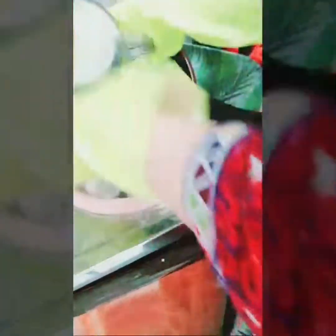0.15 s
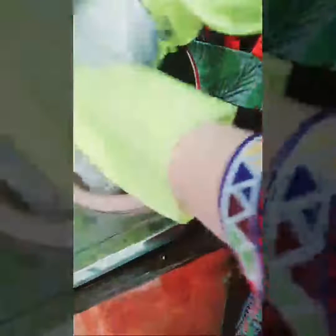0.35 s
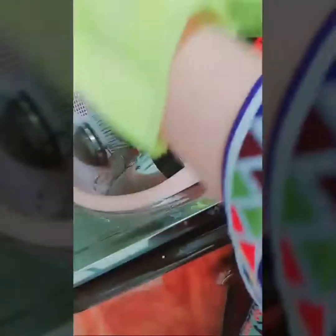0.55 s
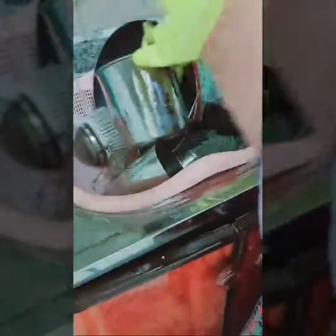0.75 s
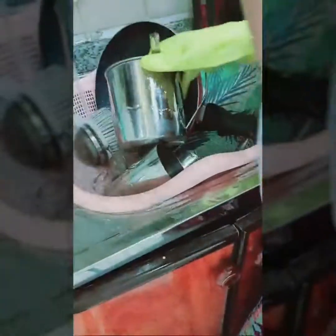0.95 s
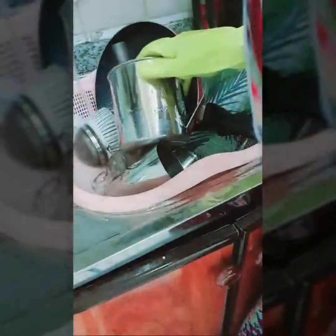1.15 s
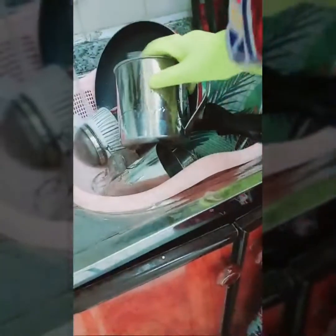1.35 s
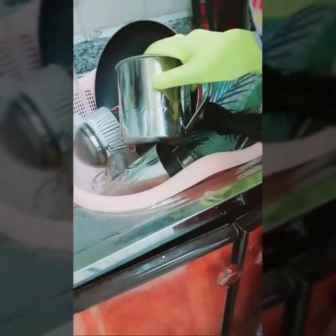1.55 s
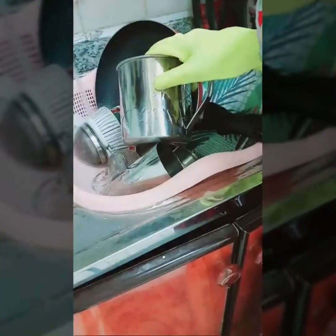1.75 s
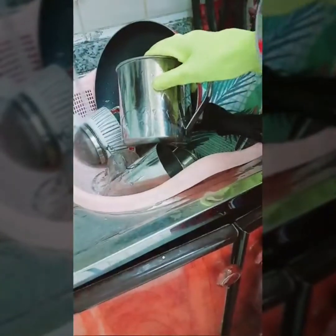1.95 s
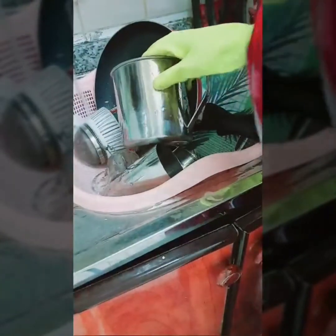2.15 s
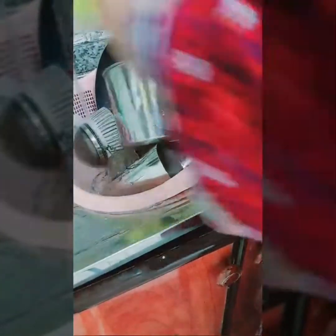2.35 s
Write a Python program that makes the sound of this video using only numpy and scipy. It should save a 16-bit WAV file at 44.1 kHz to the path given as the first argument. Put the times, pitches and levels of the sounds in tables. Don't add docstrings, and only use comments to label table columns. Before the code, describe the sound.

Steel dishes clatter in a metal kitchen sink, heard close on a phone microphone. Dull rattling bumps begin around 0.1 s; a loud hard clank at 0.4 and a lighter one at 0.6 set cups ringing, leaving a thin singing tone. From 1.1 to 1.5 a pot scrapes, squeaks and moans hollowly. Dull thumps and knocks follow from 1.55 to 2.3 over faint kitchen hum and hiss.

```python
import sys
import numpy as np
from scipy import signal
from scipy.fft import rfft, irfft
from scipy.io import wavfile
from scipy.ndimage import uniform_filter1d

SR = 44100
rng = np.random.default_rng(int(sys.argv[2]) if len(sys.argv) > 2 else 0)


def ratio(d):
    e = np.asarray(d, float) / 20
    return 10 ** e


def to_wav(s):
    ch = np.atleast_2d(s).T
    pcm = np.round(np.clip(ch, -1, 1) * 32767)
    wavfile.write(sys.argv[1], SR, pcm.astype(np.int16))


N = 103635

# (time [s], boom [dB], knock [dB], clatter [dB], rattle length [s])
BUMPS = [(0.124, -35.5, -33.5, -31, 0.084), (0.197, -27, -26.5, -30, 0.05), (0.298, -27, -31, -39, 0.063),
         (0.4, -12, -22.5, -25, 0.016), (0.421, -26, -34, -53, 0.082), (0.608, -19, -27.5, -28.5, 0.025),
         (0.67, -29, -39, -50, 0.051), (0.75, -45.5, -46, -57, 0.12), (1.558, -24, -34.5, -48, 0.03),
         (1.594, -37.5, -42.5, -63, 0.075), (1.727, -32, -53, -36.5, 0.035),
         (1.748, -17, -31.5, -38, 0.025), (1.826, -33.5, -43, -41.5, 0.025),
         (1.947, -54, -79, -41.5, 0.055), (2.006, -17, -30, -37.5, 0.039), (2.108, -27, -62, -56, 0.027),
         (2.146, -25.5, -39, -37, 0.034), (2.201, -38.5, -40, -46.5, 0.063),
         (2.271, -34.5, -52, -51, 0.033), (2.309, -49, -57, -37, 0.011)]
# (frequency [Hz], level [dB], t60 [s])
FLOOR_MODES = [(63, 0, 0.5), (83.7, -1.5, 0.22), (117.7, 2.5, 0.092), (142, -10.5, 0.031),
               (255.7, -9, 0.24)]
# (frequency [Hz], level [dB], t60 [s])
WALL_MODES = [(356, 3, 0.034), (448.3, -6.5, 0.055), (506, -9.5, .08), (638, 6, 0.28), (773, 0.5, 0.079),
              (977, -7, 0.3), (1455, -10, 0.052)]
# (frequency [Hz], density [dB per Hz])
CLATTER_SPECTRUM = [(500, -5), (900, -4), (1500, -5), (2800, 0.5), (5000, -3.5), (7500, -7.5), (13000, -32)]


def basin():
    boom_fall_s, clatter_fall_s = 0.029, 0.044
    _, boom_db, knock_db, clatter_db, _ = np.transpose(BUMPS)
    rattle = grit(2000, 2.72, 0.75)
    floor = body(rattle * bursts(boom_db, boom_fall_s), FLOOR_MODES)
    wall = body(rattle * bursts(knock_db, boom_fall_s), WALL_MODES)
    clatter = evened(banded(colour(rattle, CLATTER_SPECTRUM)))
    return floor + wall, clatter * bursts(clatter_db, clatter_fall_s)


def bursts(level_db, fall_s):
    rise_s = 0.0017
    t = np.arange(N) / SR
    start, length = np.transpose(BUMPS)[[0, -1]][:, :, None]
    rise = np.clip((t - start) / rise_s, 0, 1)
    fall = np.exp(-np.maximum(t - start - length, 0) / fall_s)
    return np.sqrt(((ratio(level_db)[:, None] * rise * fall) ** 2).sum(0))


# (time [s], level [dB])
RIM_HITS = [(.131, -46), (.203, -41), (.216, -40), (.244, -42), (.313, -27.5), (.334, -28), (.408, -16),
            (.622, -22.5), (.796, -37), (.83, -56), (1.566, -32), (1.737, -40), (1.752, -28), (1.765, -30),
            (1.812, -32), (2.011, -24), (2.03, -28), (2.06, -22.5), (2.127, -31), (2.166, -31),
            (2.199, -26), (2.226, -37.5), (2.278, -37.5)]
# (frequency [Hz], level [dB], t60 [s])
RIM_MODES = [(297, -6.5, 0.089), (396, -6, 0.068), (463.5, 0, 0.095), (555, 0.5, 0.023),
             (729, -10.5, 0.042), (942, -12.5, 0.021), (1135, -19.5, 0.025), (1470, -7, 0.12),
             (1826, -8.5, 0.035)]


def rim_knocks():
    return ring(RIM_HITS, RIM_MODES, 4.0, 0.39)[0]


# (time [s], level [dB])
CLANK_HITS = [
    (.406, -20.5),
    (.411, -19.5),
    (0.39, -31),
    (.611, -29.5),
    (.619, -28),
    (.313, -31.5),
    (0.24, -34),
]
# (frequency [Hz], level [dB], t60 [s])
CLANK_MODES = [(533, 3.5, 0.052), (800, -3, 0.13), (1004, 1, 0.084), (1184, 2, 0.044), (1510, -6, .06),
               (2040, -12, 0.072), (2370, -8, 0.045)]


def clanks():
    return ring(CLANK_HITS, CLANK_MODES, 2.8, 0.19)[0]


# (time [s], crack [dB], crowd [dB], crowd t60 [s])
BLOWS = [
    (0.13, -40, -46, 0.096),
    (0.203, -44, -35, 0.052),
    (0.406, -9, -25.5, 0.29),
    (.611, -24.5, -22.5, 0.23),
    (0.975, -47, -45, 0.21),
    (1.192, -20.5, -29.5, 0.25),
    (1.382, -28, -40, 0.066),
]
# (frequency [Hz], density [dB per Hz])
BLOW_SPECTRUM = [(1500, -7), (3000, 0.5), (5300, 0.5), (7500, 0), (9500, 0), (12000, -1.5)]


def blows():
    count, low_hz, high_hz, spread_db = 160, 2256, 13020, 10
    crack_s, rise_s = 0.0037, 0.0012
    out, t = np.zeros((2, N)), np.arange(SR // 5) / SR
    hiss = evened(colour(grit(4000, 4.9, 1), BLOW_SPECTRUM))[:len(t)]
    crack = hiss * np.exp(-t / crack_s) * np.minimum(t / rise_s, 1)
    for s, crack_db, crowd_db, t60 in BLOWS:
        place, share, last, late, left, right = rng.random((count, 6)).T[:, :, None]
        hz = low_hz + (high_hz - low_hz) * place
        own = np.maximum(t - 0.027 * late, 0)
        fall_db = 60 * own / (t60 * (.5 + .5 * last))
        level = ratio(read(BLOW_SPECTRUM, hz) - spread_db * share - fall_db) * (own > 0)
        sides = (left, left + right - .5)
        crowd = np.array([(level * np.sin(2 * np.pi * (hz * own + side))).sum(0) for side in sides])
        crowd = crowd / np.sqrt(np.mean(crowd[:, :1000] ** 2))
        at = round(s * SR)
        out[:, at:at + len(t)] += ratio(crowd_db) * crowd + ratio(crack_db) * crack
    return out


# (time [s], level [dB])
CUP_HITS = [
    (.406, -14),
]
# (frequency [Hz], level [dB], t60 [s])
CUP_MODES = [(2541, -12, 0.1), (2824, -7.5, 0.34), (4470, -16, 0.49), (4910, -5, 0.14), (5483, -13.5, 0.25),
             (6099, -11, 0.048), (6551, -33, 0.39), (7730, -3, 0.25), (7640, -6, 0.19), (661, 0, 0.067),
             (256, -7.5, 0.53), (1780, -8.5, 0.12), (3700, -5, 0.13), (4740, -13, 0.11)]
# (time [s], level [dB])
REBOUND_HITS = [
    (.417, -6),
]
# (frequency [Hz], level [dB], t60 [s])
REBOUND_MODES = [(3015, 0, .165)]
# (time [s], level [dB])
MUG_HITS = [
    (.611, -31.5),
    (.624, -21.5),
    (.64, -39.5),
    (.668, -35),
    (.695, -41),
]
# (frequency [Hz], level [dB], t60 [s])
MUG_MODES = [(704, -1, 0.16), (2470, -7, 0.35), (4188, -33, 0.19), (4888, -6, 0.19), (5670, -5.5, 0.23),
             (5570, -8, 0.21), (6360, -13, 0.058), (7320, 4.5, .1), (7460, 0, 0.13), (1809, -22, 0.13),
             (2898, -10.5, 0.36), (3310, -15, 0.46), (3570, -6, 0.34), (1140, -14, 0.071)]


def cups():
    first = ring(CUP_HITS, CUP_MODES, 0, 1.0) + ring(REBOUND_HITS, REBOUND_MODES, 0, 0.033)
    return first + ring(MUG_HITS, MUG_MODES, 2.5, 1.0)


# (time [s], level [dB])
LID_HITS = [
    (.70, -33),
    (.745, -36),
]
# (frequency [Hz], level [dB], t60 [s])
LID_MODES = [(3880, 0, 0.37), (2947, -8, 0.21)]


def lid():
    return ring(LID_HITS, LID_MODES, 0, 0.83)


# (time [s], level [dB])
PAN_HITS = [
    (.665, -43),
]
# (frequency [Hz], level [dB], t60 [s])
PAN_MODES = [(1377, 0, 3.5)]


def pan():
    return ring(PAN_HITS, PAN_MODES, 0, 1.0)


# (time [s], level [dB])
POT_HITS = [
    (1.191, -27.5),
    (1.215, -47),
]
# (frequency [Hz], level [dB], t60 [s])
POT_MODES = [(2370, 3.5, 0.16), (1630, 2, 0.22), (850, -9, 0.38), (435, -5, 0.13), (3270, 2, 0.088)]
# (time [s], level [dB])
HUM_HITS = [
    (1.525, -46),
    (1.565, -45),
    (1.65, -47),
]
# (frequency [Hz], level [dB], t60 [s])
HUM_MODES = [(552, 0, 0.87)]
# (time [s], level [dB])
CATCH_HITS = [
    (1.372, -22),
    (1.389, -25.5),
]
# (frequency [Hz], level [dB], t60 [s])
SQUEAK_MODES = [(3295, 5.5, 0.17), (5110, -2, 0.22)]


def pot_rings():
    knocked = ring(POT_HITS, POT_MODES, 3.9, 0.57)
    humming = ring(HUM_HITS, HUM_MODES, 0.96, 1.0)
    return knocked + humming + ring(CATCH_HITS, SQUEAK_MODES, 0, 1.0)


# (time [s], scrape [dB], hollow note [dB])
DRAG = [
    (1.122, -39, -52),
    (1.179, -31.5, -36.5),
    (1.199, -18.5, -32),
    (1.25, -24, -29.5),
    (1.285, -27.5, -31.5),
    (1.355, -28.5, -24),
    (1.39, -23.5, -29),
    (1.434, -26.5, -34),
    (1.49, -44, -41),
]
# (frequency [Hz], width [Hz], level [dB])
FLAT_PEAKS = [(1696, 32, -9.5), (2360, 14, -17), (2840, 28, -0.5), (3330, 110, 3.5), (4410, 72, -21),
              (5060, 23, 3), (5340, 40, 0), (5860, 38, -4.5), (6700, 31, 1), (7060, 73, 6.5)]
# (frequency [Hz], width [Hz], level [dB])
TILTED_PEAKS = [(1713, 51, 0.5), (2500, 450, 5.5), (2970, 30, -5), (3490, 150, -1), (3450, 59, -20),
                (3700, 41, -1.5), (4200, 33, -26), (5000, 28, -32), (7430, 71, -1)]
# (frequency [Hz], density [dB per Hz])
GRIT_SPECTRUM = [(530, -39), (900, -7.5), (1680, -24), (2230, -24), (3280, 1), (11900, -13), (13500, -47)]


def scrape():
    tilt_s, tilt_span_s, hiss_db = 1.29, 0.27, -2.5
    s, db, _ = np.transpose(DRAG)
    slips, t = grit(2500, 2.5, 0.56), np.arange(N) / SR
    flat, tilted = wandering(slips, FLAT_PEAKS), wandering(slips, TILTED_PEAKS)
    tilt = np.clip((t - tilt_s) / tilt_span_s + .5, 0, 1) * np.pi / 2
    level = ratio(np.interp(t, s, db, -120, -120) + 0.52 * drift(200))
    hiss = ratio(hiss_db) * evened(banded(colour(slips, GRIT_SPECTRUM)))
    return level * evened(np.cos(tilt) * flat + np.sin(tilt) * tilted + hiss)


def wandering(slips, peaks):
    wander_db, out = 4, np.zeros(N)
    for hz, width_hz, db in peaks:
        out += ratio(db + wander_db * drift(700)) * evened(resonate(slips, hz, 1.65 * width_hz))
    return evened(out)


# (time [s], level [dB], half width [s])
SWELLS = [
    (1.251, -26, 0.016),
    (1.311, -26, 0.017),
    (1.356, -18, .009),
    (1.384, -21, 0.0075),
    (1.41, -26.5, 0.0072),
    (1.429, -28, 0.0047),
]


def hollow():
    hz, width_hz = 514.5, 55.5
    s, _, db = np.transpose(DRAG)
    t = np.arange(N) / SR
    slips = grit(360, 4.8, 0.55)
    note = evened(resonate(resonate(slips, hz, width_hz), hz, 2 * width_hz))
    swells = sum(ratio(d) * np.exp(-((t - at) / width) ** 2) for at, d, width in SWELLS)
    tone = np.sin(2 * np.pi * np.cumsum(hz + 12 * drift(900)) / SR)
    return note * ratio(np.interp(t, s, db - 5, -120, -120)) + swells * tone


def kitchen(x):
    room_t60_s, room_db, even_share = .22, -12, .7
    wide_db, wide_hz = 1.5, 482
    t = np.arange(SR // 3) / SR
    taps = rng.choice([-1., 1.], (2, len(t))) * (rng.random((2, len(t))) < .05)
    near = taps * np.exp(-t / 0.004)
    tail = taps * ratio(-60 * t / room_t60_s) * (t > .008)
    sheen = rfft(near[:, :512])
    near[:, :512] = irfft(sheen / (abs(sheen) + 1e-9) ** even_share) * np.linspace(1, 0, 512)
    near[:, 512:] = 0
    near, tail = near / np.linalg.norm(near[0]), tail / np.linalg.norm(tail[0])
    high = signal.lfilter(*signal.butter(2, wide_hz, "high", fs=SR), x)
    return signal.fftconvolve(high[None], ratio(wide_db) * near + ratio(room_db) * tail, axes=1)[:, :N]


# (frequency [Hz], density [dB per Hz])
AIR_SPECTRUM = [(24, -38), (40, -2), (103, -11.5), (186, -17), (1510, -18.5), (5480, -15.5), (12200, -22.5),
                (13500, -39)]
# (frequency [Hz], likeness [0 to 1])
LIKENESS = [(60, 1), (230, 1), (890, 0.1), (3410, 0.023), (13100, 0.036)]


def air():
    air_db, hum_hz, hum_width_hz, hum_db = -39, 97, 35, -49
    frames, hz = N // 256 + 5, np.fft.rfftfreq(1024, 1 / SR)
    a, b, c, d, patches = rng.standard_normal((frames, 513, 5)).T
    patches = evened(uniform_filter1d(uniform_filter1d(patches, 10, 0), 10, 1))
    same = np.clip(read(LIKENESS, hz) - .1, -1, 1)[:, None]
    left = a + 1j * b
    right = same * left + np.sqrt(1 - same ** 2) * (c + 1j * d)
    z = np.array([left, right]) * ratio(read(AIR_SPECTRUM, hz)[:, None] + 3.3 * patches)
    hiss = evened(signal.istft(z, nperseg=1024, noverlap=768)[1][:, :N])
    hum = resonate(rng.standard_normal(N), hum_hz, hum_width_hz)
    hum = evened(resonate(hum, hum_hz, hum_width_hz))
    return ratio(air_db) * hiss + ratio(hum_db) * hum


def ring(hits, modes, uneven_db, twin):
    twin_hz, twin_fade_s, side_turn, rise_s = 17.1, .22, 1.5, 0.00044
    out = np.zeros((2, N))
    longest = round(SR * (max(np.transpose(modes)[-1]) / 2 + .17))
    for s, hit_db in hits:
        at = round(s * SR)
        t = np.arange(min(N - at, SR // 2 + 2000, longest)) / SR
        fade = np.clip((t[-1] - t) / 0.14, 0, 1)
        for hz, db, t60 in modes:
            share, turn, side, beat = rng.uniform(-1.142, 1, 4)
            level = ratio(hit_db + db + uneven_db * share - 60 * t / t60) * np.minimum(t / rise_s, 1)
            beating = np.cos(2 * np.pi * twin_hz * (1.396 + beat) * t + 9 * turn)
            level = level * (1 + twin * np.exp(-t / twin_fade_s) * beating) * fade
            sides = np.array([[0], [min(hz / 2500, 1) * side_turn * side]])
            out[:, at:at + len(t)] += level * np.sin(2 * np.pi * hz * t + np.pi * turn + sides)
    return out


def body(push, modes):
    scale = np.sqrt(sum(ratio(2 * db) * 2 * np.pi * 3.3 / t60 / SR for hz, db, t60 in modes))
    return sum(ratio(db) * resonate(push, hz, 1.846 / t60) for hz, db, t60 in modes) / scale


def resonate(x, hz, width_hz):
    r = np.exp(-np.pi * width_hz / SR)
    return 2 * signal.lfilter([1 - r], [1, -r * np.exp(2j * np.pi * hz / SR)], x).real


def grit(per_s, spread_db, smooth):
    size = ratio(spread_db * np.minimum(rng.exponential(1, N), 4)) * rng.choice([-1., 1.], N)
    contacts = evened(size * (rng.random(N) < per_s / SR))
    return evened(contacts + smooth * rng.standard_normal(N))


def banded(x):
    bands_db = 5
    z = signal.stft(x, nperseg=1024, noverlap=768)[2]
    patches = uniform_filter1d(rng.standard_normal(z.shape[::-1]), size=12, axis=0)
    patches = evened(uniform_filter1d(patches, size=3, axis=1)).T
    return signal.istft(z * ratio(bands_db * patches - 3), nperseg=1024, noverlap=768)[1][:N]


def drift(size):
    return evened(uniform_filter1d(uniform_filter1d(rng.standard_normal(N), size), size))


def evened(x):
    return x / np.sqrt(np.mean(x ** 2) + 1e-20)


def read(points, hz):
    f, value = np.transpose(points)
    return np.interp(np.log(hz + 1), np.log(f + 1), value)


def colour(x, points):
    return irfft(rfft(x) * ratio(read(points, np.fft.rfftfreq(N, 1 / SR))), N)


def scene():
    boom, clatter = basin()
    rough = clatter + scrape()
    rings = cups() + lid() + blows() + pan() + pot_rings()
    boom = boom + rim_knocks() + clanks()
    near = boom + hollow() + ratio(-7) * rough + rings
    room = kitchen(rough + ratio(-3.0) * rings[0] + ratio(-3.5) * boom)
    balance = ratio(np.array([[.5], [-.5]]))
    return (near + room) * balance + air()


def top_cut(x):
    return signal.sosfilt(signal.butter(12, 13730, fs=SR, output="sos"), x)


# (frequency [Hz], level [dB])
MIC_RESPONSE = [(35, -16.5), (70, 1.5), (7800, -0.5), (9300, -10.5), (11800, -1.5)]


def record(dry):
    edge_hz = 13450
    heard = np.array([colour(side, MIC_RESPONSE) for side in dry])
    heard = np.tanh(heard / 1.132) * 1.05
    low_pass = signal.firwin(numtaps=601, cutoff=edge_hz, fs=SR)
    heard = signal.oaconvolve(heard, low_pass[None], "same")
    return top_cut(heard)


dry = scene()
out = record(dry)
to_wav(out)
```